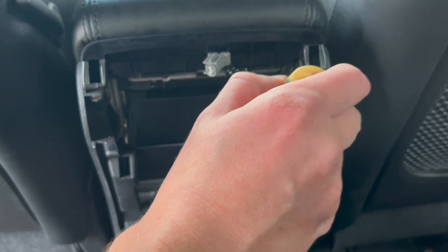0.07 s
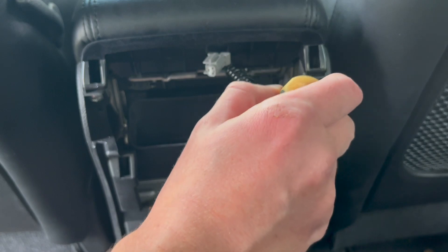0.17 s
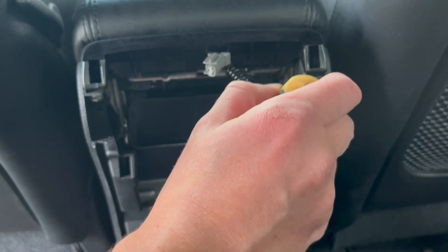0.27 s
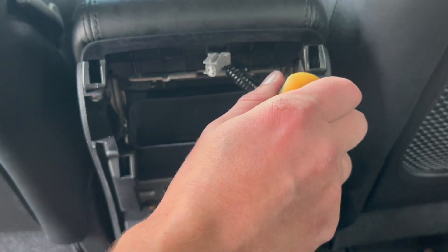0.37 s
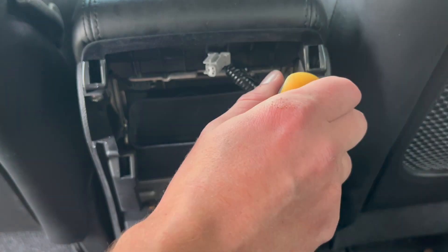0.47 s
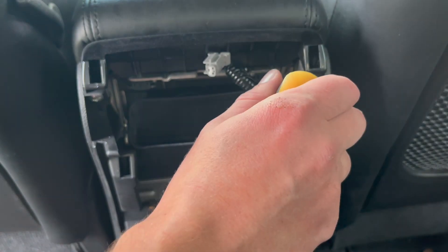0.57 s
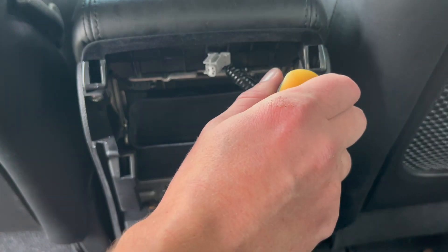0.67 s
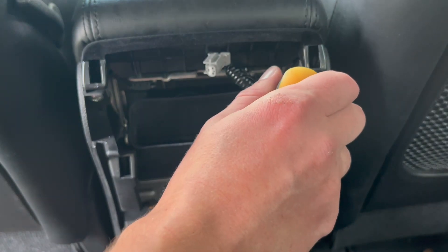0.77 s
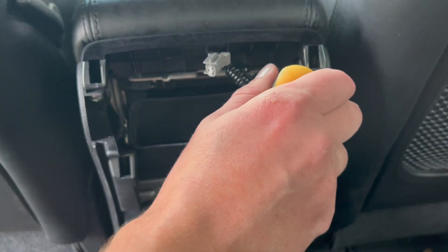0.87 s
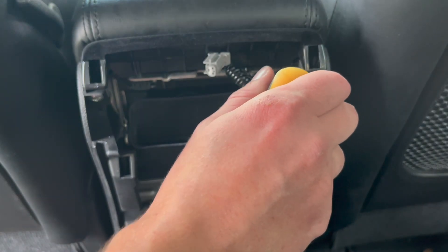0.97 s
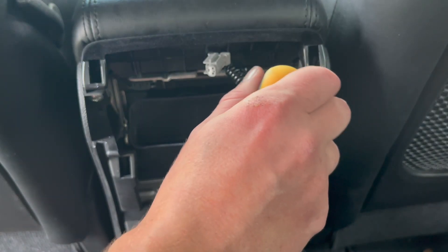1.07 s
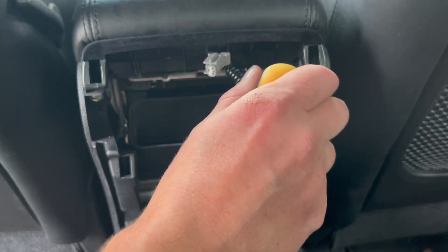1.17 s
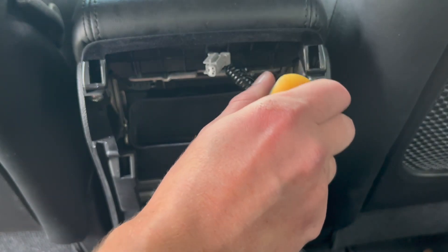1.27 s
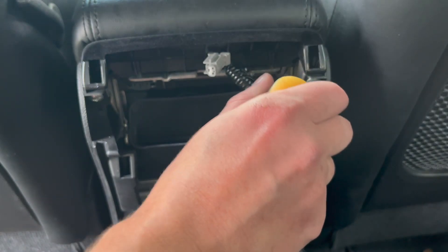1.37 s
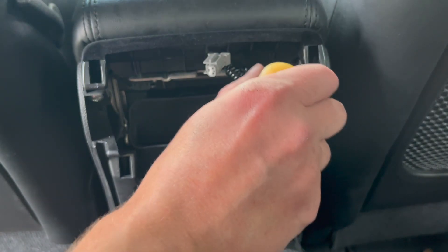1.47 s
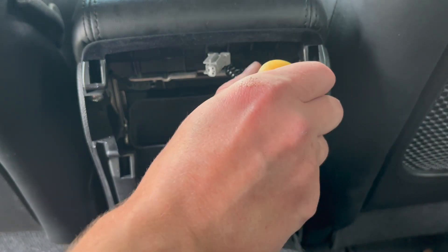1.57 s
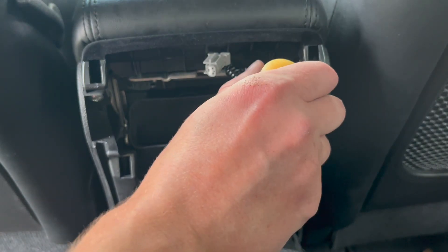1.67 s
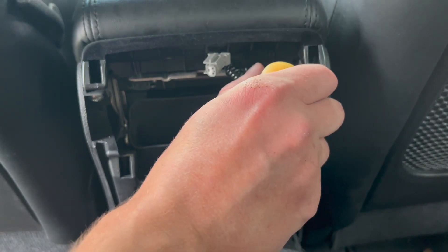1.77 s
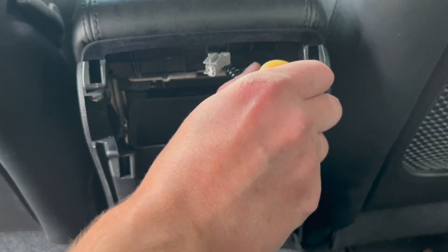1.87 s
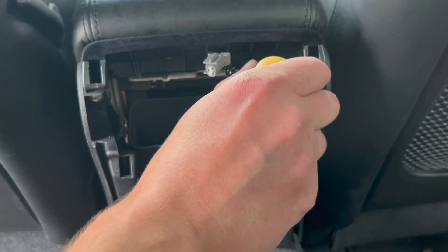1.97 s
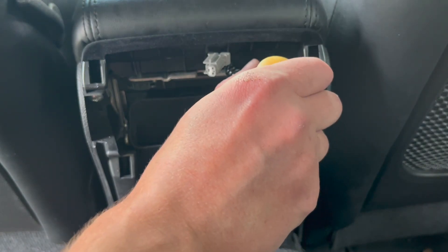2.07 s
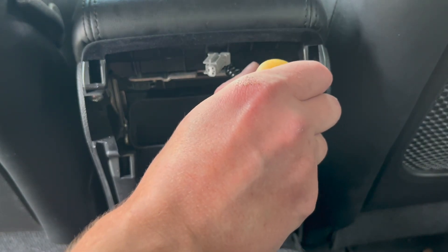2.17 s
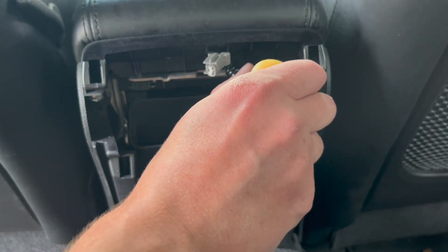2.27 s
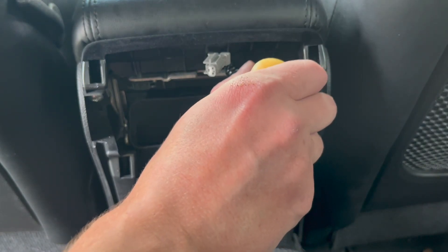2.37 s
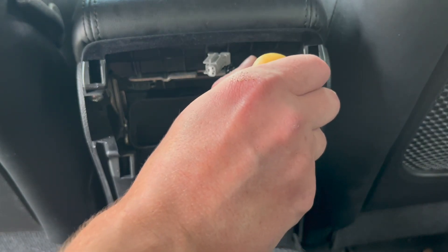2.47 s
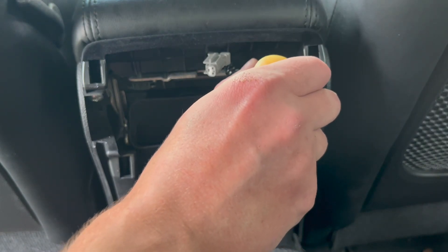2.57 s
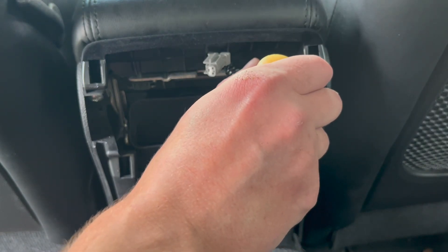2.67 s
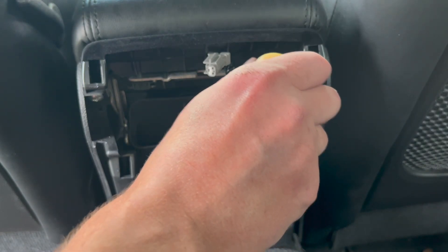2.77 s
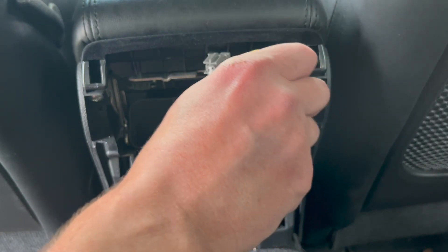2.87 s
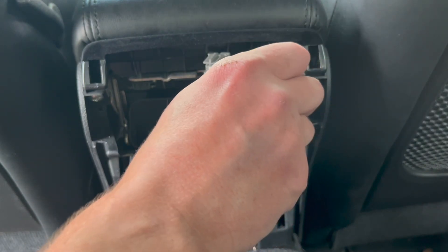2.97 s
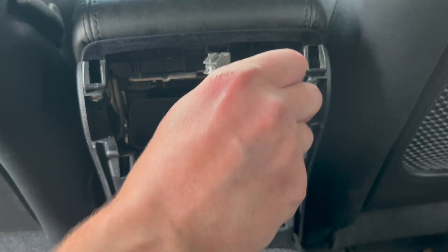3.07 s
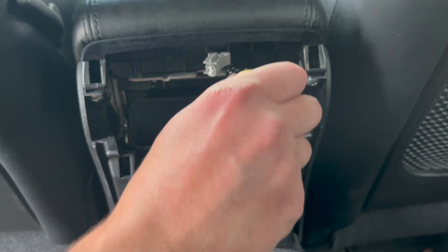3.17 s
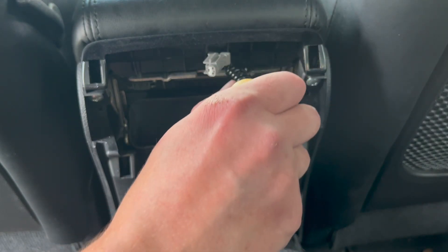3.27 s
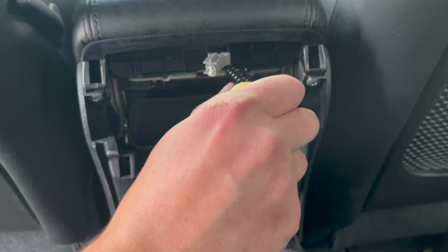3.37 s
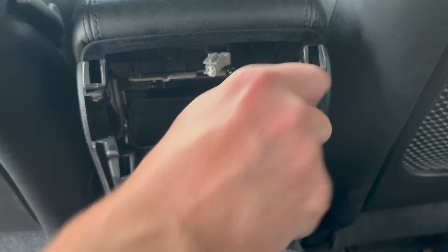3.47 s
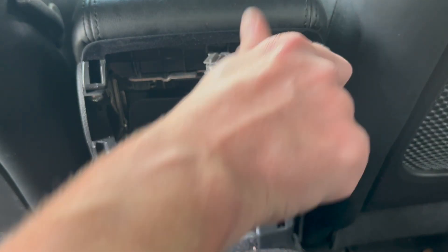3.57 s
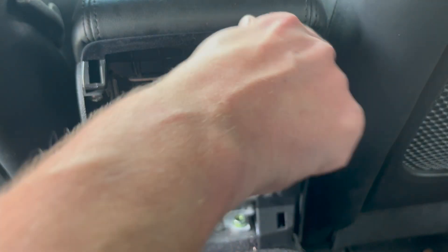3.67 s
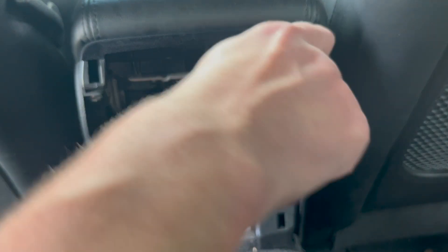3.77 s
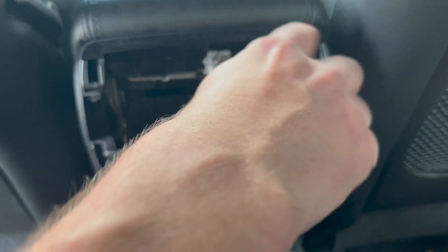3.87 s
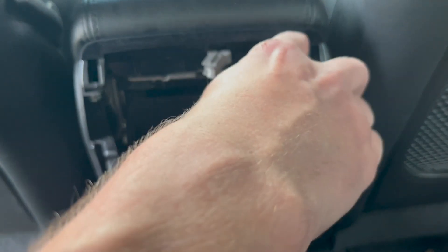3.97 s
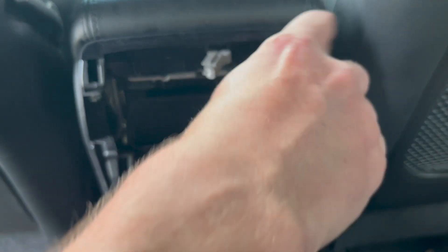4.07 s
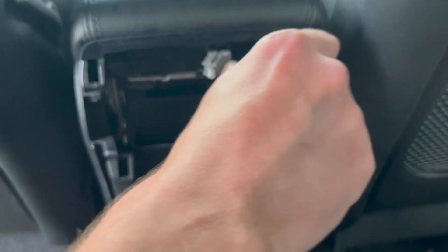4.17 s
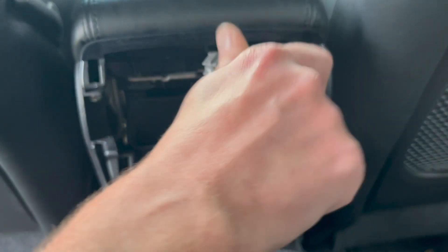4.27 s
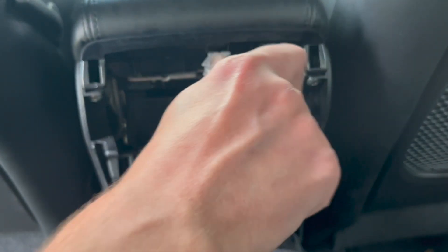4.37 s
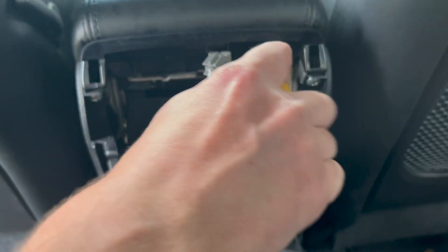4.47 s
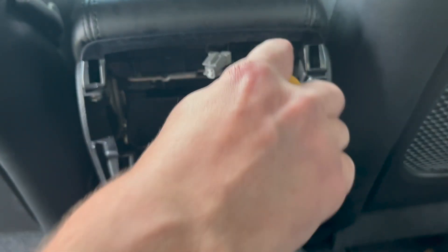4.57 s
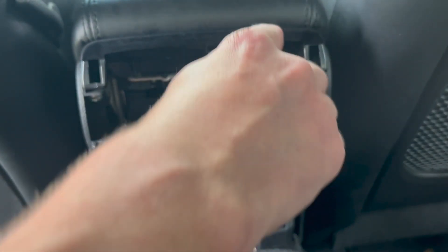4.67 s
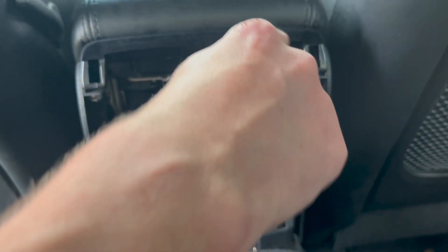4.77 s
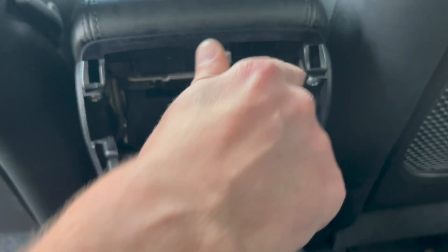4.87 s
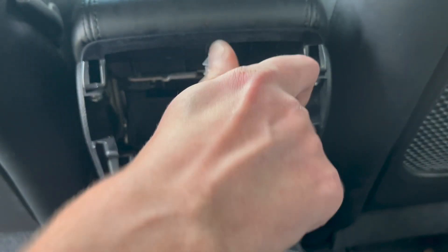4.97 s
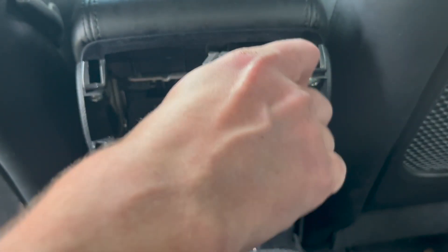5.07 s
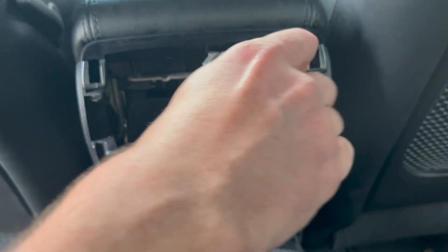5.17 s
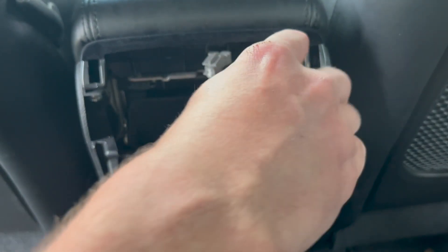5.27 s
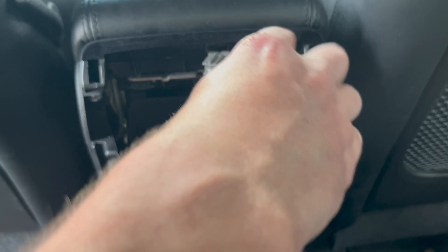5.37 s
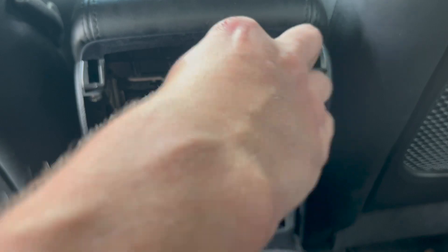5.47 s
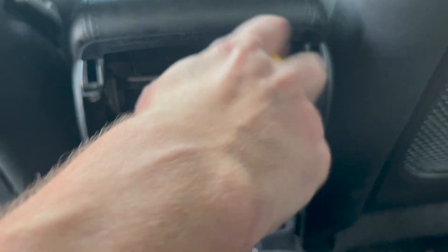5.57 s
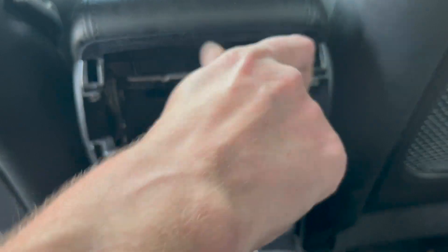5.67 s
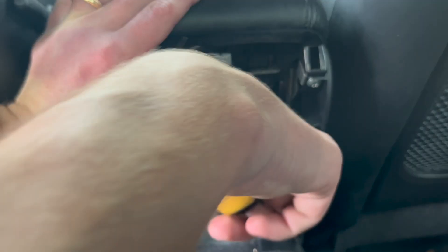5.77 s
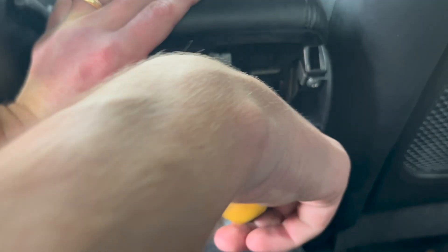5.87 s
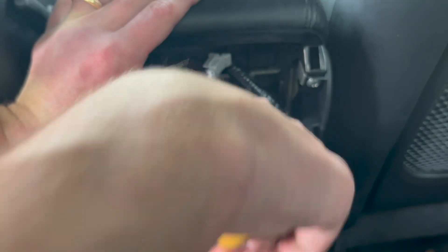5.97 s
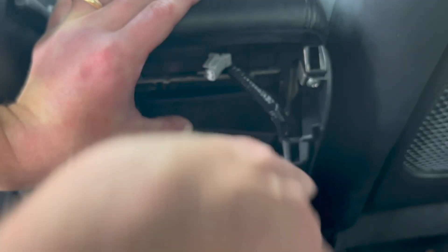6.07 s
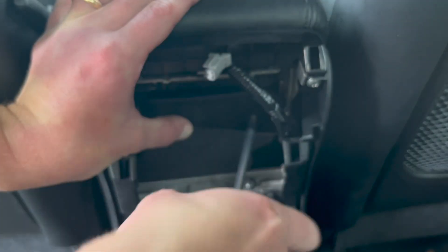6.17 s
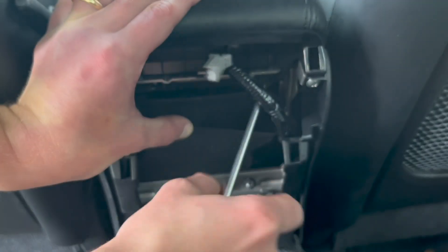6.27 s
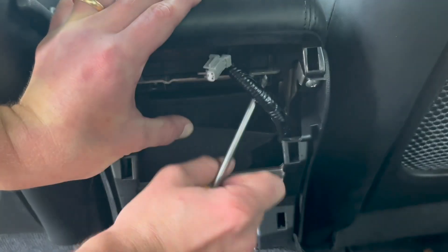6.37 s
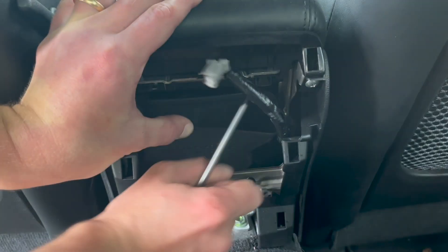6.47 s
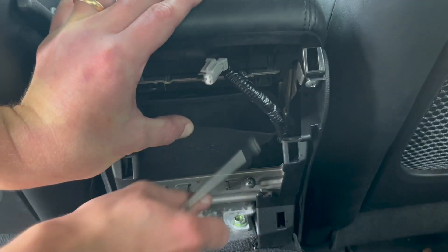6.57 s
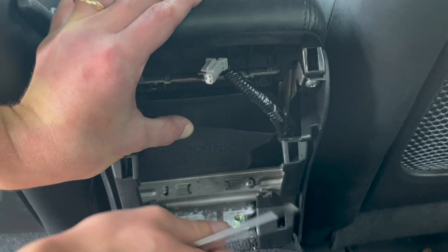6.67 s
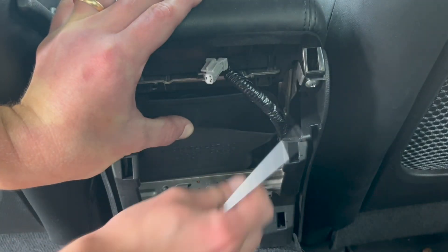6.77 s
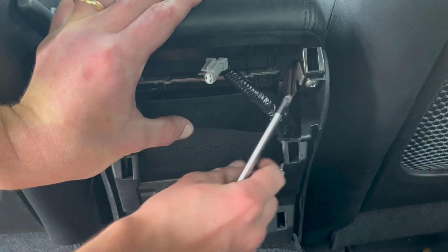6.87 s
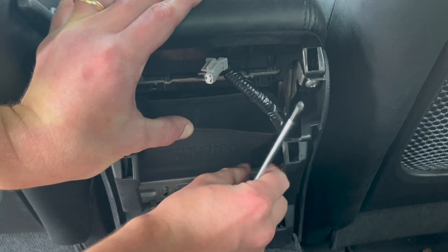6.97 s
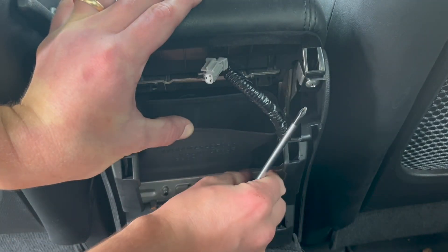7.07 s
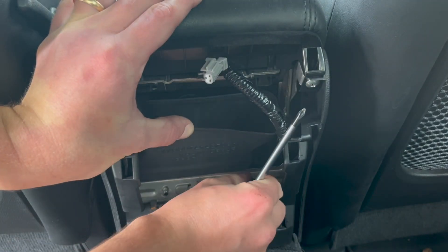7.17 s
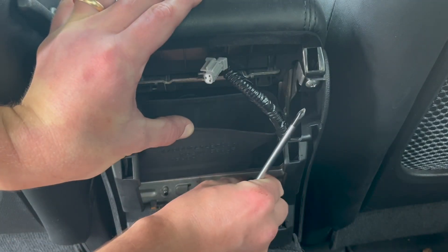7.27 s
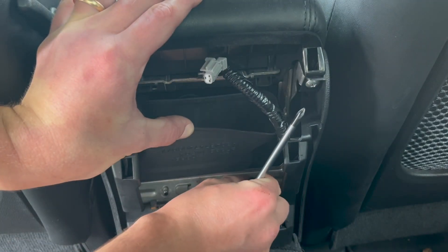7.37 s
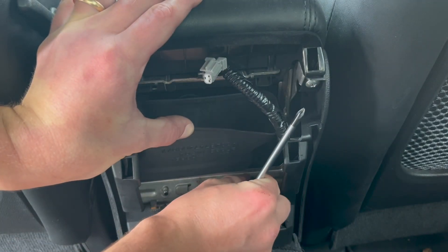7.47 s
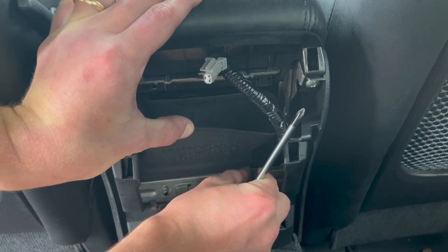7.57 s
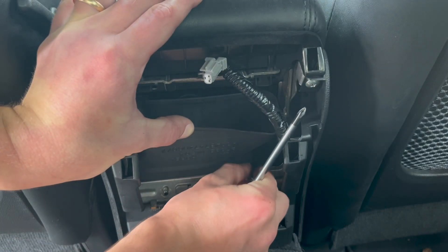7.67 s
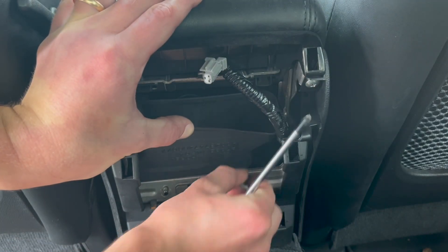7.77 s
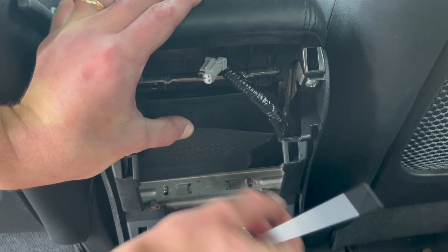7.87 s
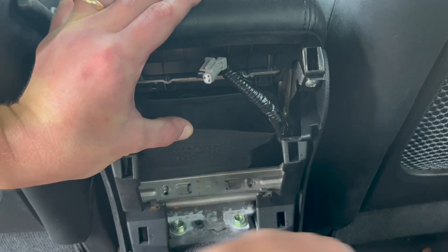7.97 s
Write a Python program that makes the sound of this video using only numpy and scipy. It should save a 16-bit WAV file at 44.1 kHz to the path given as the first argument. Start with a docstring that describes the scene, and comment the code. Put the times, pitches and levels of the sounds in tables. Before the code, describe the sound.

Inside a quiet car cabin, close and dry in mono, a ratchet screwdriver works a tight screw: a gritty steel scrape, then irregular sharp clicks with small plastic jolts, the brightest just after three seconds. Handle rattles follow, with sparse knocks, then a cluster of bumps and taps on plastic trim past six seconds and faint metallic pings. A low, wavering hum lies beneath and fades late.

```python
"""Ratchet screwdriver in a car cabin

A ratchet screwdriver backs a tight screw out of a plastic console inside a car, over a low hum, rumble and air.
Each slip is a sharp force that rings resonances of the steel shaft, the pawl and the console; steel scrapes
as random tiny slips. The hollow handle rattles in the hand, and the tool bumps and taps the trim.
Sharp blows carry a very short tail of reflections; cabin noise is coloured noise with slow level curves."""
import sys
import numpy as np
from scipy import signal
from scipy.fft import rfft, irfft, next_fast_len
from scipy.io import wavfile
from scipy.ndimage import uniform_filter1d

SR = 44100
rng = np.random.default_rng(int(sys.argv[2]) if len(sys.argv) > 2 else 0)


def master(y):
    """Save y as 16-bit WAV."""
    cut = np.clip(np.atleast_2d(y).T, -1, 1)
    pcm = np.round(cut * 32767)  # scale
    wavfile.write(sys.argv[1], SR, pcm.astype(np.int16))


N = 353064
SIZE = 8192  # samples in one contact sound
AGE = np.arange(SIZE) / SR  # seconds since the contact sound began
TIME = np.arange(N) / SR  # seconds

# Resonances of the steel shaft held in the screw. Each row: frequency in Hz, width in Hz, relative level in dB.
SHAFT_MODES = [(2340, 510, -10), (3540, 490, -6.5), (4224, 72, 0), (4760, 240, -5), (5340, 200, -13.5),
               (6760, 107, 4.5), (6540, 3800, -8.5), (7560, 690, 1), (8510, 134, 2), (9050, 400, -1),
               (10200, 960, -26), (9570, 48, 1)]
# Resonances of the ratchet's pawl. Each row: frequency in Hz, width in Hz, relative level in dB.
PAWL_MODES = [(10175, 60, 6), (11020, 90, -6), (11333, 80, 3.5), (11650, 110, 0), (12260, 130, 2.5),
              (12800, 60, -2), (13500, 250, -10), (13772, 60, -6), (14000, 130, 1), (15200, 600, -12),
              (12000, 3000, -17)]
# Resonances of the plastic console. Each row: frequency in Hz, width in Hz, relative level in dB.
CONSOLE_MODES = [(313, 100, -2.5), (566, 34, 3.5), (697, 39, -3), (846, 87, -1), (1101, 42, 1),
                 (1423, 160, -9), (1617, 28, -4.5), (1790, 84, -14), (2570, 145, -18)]
# Resonances of a hard contact's tick. Each row: frequency in Hz, width in Hz, relative level in dB.
CONTACT_MODES = [(2650, 7200, -8.5), (4180, 100, 0), (5500, 3500, -14.5), (7170, 210, 9.5),
                 (7450, 760, 1.5), (10200, 2700, 0), (12700, 17000, -16)]


def undb(db):
    """Amplitude ratio: twenty decibels are a factor of ten."""
    return 10 ** (np.asarray(db) / 20)


def curve(rows):
    """Linear interpolation in time of rows of (seconds, value)."""
    return np.interp(TIME, *np.transpose(rows))


def add(out, s, sound):
    """Superposition: mix a sound in at time s, in seconds."""
    start = int(s * SR)
    lo, hi = max(start, 0), min(start + len(sound), N)
    out[lo:hi] += sound[lo - start:hi - start]


def noise(spectrum):
    """Spectral shaping: white noise is filtered to the given colour and scaled to rms 1."""
    hz, db = np.transpose(spectrum)
    size = next_fast_len(N, True)
    f = np.maximum(np.fft.rfftfreq(size, 1 / SR), 1)
    gain = undb(np.interp(np.log(f), np.log(hz), db))
    white = rng.standard_normal(size)
    coloured = irfft(rfft(white) * gain, size)[:N]
    return coloured / coloured.std()


def wander(hz):
    """Low-pass noise: random motion of spread 1, mostly below hz."""
    return noise([(hz, 0), (2 * hz, -24), (20 * hz, -140)])


def tone(hz, db):
    """Phase is the integral of frequency: a sine of the given rms level; pitch and level may move."""
    cycles = np.cumsum(hz * np.ones(N)) / SR + rng.random()
    return np.sqrt(2) * undb(db) * np.sin(2 * np.pi * cycles)


def blow(t60, tail_db):
    """Impulse response: a sharp contact, then dense, uneven reflections decaying 60 dB in t60 seconds."""
    grit = undb(1.45 * rng.exponential(size=SIZE))
    decay = np.exp(-np.log(1000) * AGE / t60)
    tail = grit * rng.standard_normal(SIZE) * decay
    return signal.unit_impulse(SIZE) + undb(tail_db) * tail / np.linalg.norm(tail)


def ring(force, modes, db, pitch=1, tilt_db=0, damp_hz=0, soft_hz=np.inf, order=1, size=300):
    """Modal superposition: a force excites resonances; order 2 builds up slowly, as in a hollow body.

    db is the rms of the loudest stretch of size samples; tilt_db is per octave; damp_hz adds to each width.
    """
    padded = SIZE + SIZE // 8
    # scaling the frequency axis moves every resonance by the pitch ratio
    f = np.maximum(np.fft.rfftfreq(padded, 1 / SR), 1) / pitch
    response = 0
    for k, (hz, width, mode_db) in enumerate(modes):
        damped_width = width + damp_hz
        # each contact point favours other modes a little
        level_db = mode_db + tilt_db * np.log2(hz) + rng.standard_normal()
        gain = undb(level_db) * width / damped_width
        detuning = (f - hz ** 2 / f) / damped_width
        response = response + (-1) ** k * gain / (1 + 1j * detuning) ** order
    # a small part radiates little below its first mode or above its last; a soft contact dulls it further
    top = min(max(hz + 2 * width for hz, width, _ in modes), soft_hz)
    response = response / (1 + modes[0][0] / (2j * f))
    response = response / np.sqrt(1 + (f / top) ** 10)
    sound = irfft(rfft(force, padded) * response)[:SIZE]
    loudest = np.sqrt(uniform_filter1d(sound ** 2, size).max())
    return sound * undb(db) / loudest


def boom():
    """Beating: neighbouring low tones, each wavering in level and pitch, interfere."""
    # Tones of the boom. Each row: frequency in Hz, relative level in dB.
    boom_tones = [(38.2, -21.5), (51.7, -0.5), (55.3, -17.5), (58.3, -12.5), (84, -24), (87.3, -17.5),
                  (97, -22), (110, -24)]
    # Level of the boom. Each row: time in seconds, level in dB.
    boom_level = [(0.0, -43), (0.44, -43), (0.51, -49), (0.58, -44), (1.33, -44), (1.43, -53.5),
                  (1.5, -45.5), (1.73, -45), (1.94, -52.5), (2.04, -46.5), (2.24, -52), (2.33, -47.5),
                  (2.42, -51.5), (2.94, -46.5), (3.06, -52.5), (3.27, -46), (3.36, -58.5), (3.44, -48.5),
                  (4.0, -49), (4.4, -45.5), (5.1, -45.5), (5.17, -49), (5.58, -47), (5.68, -55.5),
                  (6.4, -67), (7.1, -58.5), (8.0, -67.5)]
    waver_hz, waver_db, drift_hz = 4.6, 0.7, 0.15  # rate limit, spread of level, spread of pitch
    total = np.zeros(N)
    for hz, db in boom_tones:
        total += tone(hz + drift_hz * wander(waver_hz), db + waver_db * wander(waver_hz))
    return total * undb(curve(boom_level))


def hum():
    """Line spectrum: steady sines at fixed level."""
    # Lines of the hum. Each row: frequency in Hz, level in dB.
    hum_lines = [(75.5, -63.5), (151, -79)]
    return sum(tone(hz, db) for hz, db in hum_lines)


def rumble():
    """Broadband low-frequency noise: energy gathers around 50 Hz and follows a slow level curve."""
    # Colour of the rumble. Each row: frequency in Hz, relative level in dB per Hz.
    rumble_colour = [(12, -22.5), (28, -8), (40, 1.5), (52, 5), (66, -4.5), (88, -7), (110, -9),
                     (130, -13.5), (200, -15.5), (300, -28), (600, -41)]
    # Level of the rumble. Each row: time in seconds, level in dB.
    rumble_level = [(0, -57), (.4, -64.5), (1.2, -58), (3, -59), (5.6, -61), (5.8, -62), (8, -62)]
    return noise(rumble_colour + [(3000, -100)]) * undb(curve(rumble_level))


def air():
    """Broadband flow noise: the rush of air in the cabin is strongest in the low mids."""
    # Colour of the air. Each row: frequency in Hz, relative level in dB per Hz.
    air_colour = [(100, -2), (250, 8), (450, 5), (900, -2.5), (1500, -10), (2000, -12.5), (3000, -22.5),
                  (6500, -33.5), (12000, -61)]
    # Level of the air. Each row: time in seconds, level in dB.
    air_level = [(0, -71.5), (2.3, -72.5), (3, -75), (5.5, -73.5), (6.5, -78), (8, -78)]
    return noise(air_colour) * undb(curve(air_level))


def hiss():
    """High-frequency noise: a soft hiss swells as the arm moves away."""
    # Colour of the hiss. Each row: frequency in Hz, relative level in dB per Hz.
    hiss_colour = [(1000, -8), (2500, -2.5), (4500, -3), (7000, 1), (9000, 2), (12000, 0.5), (14000, -1),
                   (16000, -20)]
    # Level of the hiss. Each row: time in seconds, level in dB.
    hiss_level = [(0, -88.5), (.5, -88.5), (6.1, -87.5), (6.3, -82), (6.7, -87), (7.6, -88), (7.9, -82.5),
                  (8, -83.5)]
    return noise(hiss_colour) * undb(curve(hiss_level))


def cabin():
    """Superposition of independent sources: boom, hum lines, rumble, moving air and hiss."""
    return boom() + hum() + rumble() + air() + hiss()


def rub():
    """Sliding friction: skin moves unevenly on the plastic grip, as noise of fluctuating level."""
    # Colour of the rub. Each row: frequency in Hz, relative level in dB per Hz.
    rub_colour = [(250, -20), (480, -7), (620, 8.5), (900, 2), (1150, -3), (1800, -6), (2300, -19.5),
                  (3000, -22), (5000, -31), (6400, -20.5), (7500, -34), (12000, -56)]
    # Level of the rub. Each row: time in seconds, level in dB before the uneven drag.
    rub_level = [(0, -68), (.2, -64.5), (.37, -69), (.41, -105.5), (8, -120)]
    drag_db = 1.4 * wander(30)
    return noise(rub_colour) * undb(curve(rub_level) + drag_db)


def pings():
    """Light damping: out of the screw the tapped shaft rings longer, with few clear tones."""
    # Taps on the free shaft. Each row: start in seconds, level in dB.
    ping_events = [(7.498, -75.5), (7.558, -65.5)]
    # Resonances of the free shaft. Each row: frequency in Hz, width in Hz, relative level in dB.
    free_modes = [(3219, 17, 0), (6002, 25, -15), (6756, 22, -9), (8506, 22, -5), (10050, 18, 1),
                  (13000, 60, -14)]
    out = np.zeros(N)
    for s, db in ping_events:
        add(out, s, ring(signal.unit_impulse(SIZE), free_modes, db))
        add(out, s, ring(blow(t60=0.09, tail_db=16), CONTACT_MODES, db - 7))
    return out


def taps():
    """Impact on a hard surface: the steel tip's broad, heavily damped modes give a thin, short ring."""
    # Light taps of the tip. Each row: start in seconds, level in dB, tilt in dB per octave.
    tap_events = [(6.3798, -55.5, -2.5), (6.5358, -58, -13), (6.8181, -60, -2), (6.864, -67, 0.5),
                  (6.881, -77, 0), (6.92, -65, 34), (7.7593, -67, 6.5)]
    # Resonances of the tip. Each row: frequency in Hz, width in Hz, relative level in dB.
    tip_modes = [(1410, 1100, -17.5), (2280, 130, 3), (3500, 640, -9.5), (5450, 510, 0.5), (6600, 1000, -8),
                 (8170, 850, -2.5), (9800, 720, -5.5), (11260, 1300, -15)]
    out = np.zeros(N)
    for s, db, tilt_db in tap_events:
        add(out, s, ring(blow(t60=0.049, tail_db=-2.5), tip_modes, db, tilt_db=tilt_db))
    return out


def bumps():
    """Contact stiffness: a hard tick, then the plastic trim's short ring, deadened to a thud if soft."""
    # Bumps on the trim. Each row: start in seconds, trim level in dB, contact tick level in dB, pitch ratio,
    # tilt in dB per octave, frequency in Hz (before the pitch ratio) above which a soft contact gives little.
    bump_events = [(4.077, -56, -79.5, 0.78, 0.5, 605), (6.381, -47.5, -47.5, 0.95, 2, 9000),
                   (6.478, -66, -68, 0.94, 6, 9000), (6.483, -57.5, -63, 1.02, 0, 5000),
                   (6.536, -47.5, -64, 0.99, 1.5, 9000), (6.548, -53.5, -71, 0.87, -4, 3000),
                   (6.822, -64.5, -72, 1.1, -4, 1510), (6.999, -51, -69, 0.85, 4.5, 900),
                   (7.758, -53, -69, 0.86, 5, 900)]
    # Resonances of the trim. Each row: frequency in Hz, width in Hz, relative level in dB.
    trim_modes = [(354, 300, -4.5), (524, 50, 10.5), (696, 260, -28), (855, 31, -3.5), (1230, 53, -4.5),
                  (1610, 170, -10), (2480, 290, -16.5), (2770, 340, -13), (4120, 12000, -36)]
    trim_delay_s = 0.001027
    out = np.zeros(N)
    for s, trim_db, tick_db, pitch, tilt_db, soft_hz in bump_events:
        damp_hz = 110 * min(1000 / soft_hz, 1) ** 2
        add(out, s, ring(blow(t60=0.059, tail_db=-1.0), CONTACT_MODES, tick_db))
        thud = blow(t60=0.073, tail_db=0.0)
        body = ring(thud, trim_modes, trim_db, pitch, tilt_db, damp_hz, soft_hz)
        add(out, s + trim_delay_s, body)
    return out


def rattles():
    """Damping by the hand: each contact ticks and rings the hollow handle, shorter in a tight grip."""
    # Grazes, knocks and bounces of the handle. Each row: start in seconds, body level in dB,
    # contact tick level in dB, tilt in dB per octave, damping by the grip as added width in Hz.
    rattle_events = [(1.264, -52, -82, -2.5, 90), (1.786, -53, -80, 0.5, 70), (3.547, -66, -86, 4.5, 3),
                     (3.709, -58, -74, -9, 31), (3.718, -58, -65, -13, 48), (3.8768, -55, -54, -3, 120),
                     (3.886, -45.5, -54.5, 1.5, 55), (3.891, -47, -64, 4, 80), (4.367, -64.5, -68.5, 4, 50),
                     (4.371, -52, -80, -3.5, 78), (4.378, -58, -71, 7, 72), (4.395, -55.5, -81, -3, 63),
                     (5.525, -63.5, -77, 4, 25), (5.5373, -48, -58.5, -2, 30), (5.554, -57, -66, 5, 82),
                     (5.575, -56.5, -74, 2, 45), (5.697, -68, -79, -1, 3), (6.242, -60, -63, 1, 118),
                     (6.249, -51.5, -67, -6, 80), (6.258, -62, -73, -1, 142), (6.2767, -56, -63, -1, 85),
                     (6.285, -72, -76, 0, 140), (6.295, -62, -74, -4, 100), (6.308, -70, -76, 8, 50),
                     (6.328, -63, -72, -4, 90), (6.343, -68, -80, -4, 120)]
    # Resonances of the handle. Each row: frequency in Hz, width in Hz, relative level in dB.
    handle_modes = [(383, 480, -14), (551, 83, 10), (827, 70, -19), (1180, 150, -16), (1524, 51, 0),
                    (2100, 430, -30.5), (2654, 110, -15), (3030, 730, -32), (3890, 150, -29.5),
                    (4180, 270, -28.5), (5580, 450, -42)]
    pitch_spread = .015  # octaves, from contact to contact
    out = np.zeros(N)
    for s, body_db, tick_db, tilt_db, grip_hz in rattle_events:
        pitch = 2 ** (pitch_spread * rng.standard_normal())
        add(out, s, ring(blow(t60=0.051, tail_db=4.5), CONTACT_MODES, tick_db))
        chatter = blow(t60=0.042, tail_db=4)
        add(out, s, ring(chatter, handle_modes, body_db, pitch, tilt_db, grip_hz, order=2))
    return out


def scrapes():
    """Stick-slip friction: tiny slips and sharper catches ring shaft, pawl and console; one mode sings."""
    # Steel rubbing on steel as the tool turns. Each row: time of the strongest moment in seconds, length in
    # seconds, # shaft level in dB, console level in dB, singing resonance in Hz, its level in dB.
    scrape_events = [(0.006, 0.043, -50, -60, 7400, -55), (0.018, 0.08, -57.5, -58.5, 1730, -55.5),
                     (0.817, 0.068, -68, -64, 8150, -96), (1.195, 0.034, -81, -64, 8600, -83),
                     (1.219, 0.077, -70, -67.5, 8460, -71), (1.245, 0.048, -62.5, -73, 8350, -74),
                     (1.416, 0.034, -64, -70, 4200, -75), (1.436, 0.045, -60, -69.5, 4260, -72),
                     (1.762, 0.13, -78.5, -71, 8400, -82), (1.98, 0.16, -80.5, -98, 8200, -89),
                     (2.185, 0.069, -82, -89, 8440, -74), (2.369, 0.059, -67.5, -76, 8060, -70.5),
                     (3.729, 0.06, -62, -73, 7450, -72), (3.744, 0.038, -60.5, -82, 9120, -60.5),
                     (3.878, 0.06, -64, -76, 7360, -65), (4.829, 0.035, -86, -74.5, 1120, -76),
                     (5.38, 0.046, -81, -92, 7000, -92), (5.855, 0.038, -73, -71, 5700, -82),
                     (6.293, 0.18, -77, -73.5, 2670, -75), (6.912, 0.068, -89, -90, 9400, -75),
                     (6.986, 0.033, -75, -94, 9900, -79)]
    rise_share = 0.43  # of the length, spent swelling
    pawl_db = -21  # relative to the shaft
    press_hz = 93  # pressing on the screw damps the shaft: added width
    catches_per_s, catch_db = 260, 15  # mean rate, size relative to noise of rms 1
    out = np.zeros(N)
    for s, length, db, buzz_db, sing_hz, sing_db in scrape_events:
        rise, fall = rise_share * length, (1 - rise_share) * length
        peak = 2 * rise  # seconds after the sound begins
        swell = np.exp(-3 * np.maximum(2 - AGE / rise, (AGE - peak) / fall))
        catches = undb(catch_db) * (rng.random(SIZE) < catches_per_s / SR)
        fine = rng.standard_normal(SIZE) * undb(1.06 * rng.exponential(size=SIZE))
        slips = swell * (fine + catches)
        shaft = ring(slips, SHAFT_MODES, db, damp_hz=press_hz)
        pawl = ring(slips, PAWL_MODES, db + pawl_db)
        sing = ring(slips, [(sing_hz, 330, 0)], sing_db, order=2)
        buzz = ring(slips, CONSOLE_MODES, buzz_db)
        add(out, s - peak, shaft + pawl + sing + buzz)
    return out


def ratchet():
    """Impulsive excitation: the pawl snaps over a tooth; the shaft rings and jolts the console."""
    # Ratchet clicks. Each row: start in seconds, shaft level in dB, pawl level in dB,
    # console level in dB, tilt of the pawl's ring in dB per octave.
    click_events = [(0.18, -47.5, -90, -50, -3), (0.963, -77.5, -73.5, -58, -18), (1.26, -71, -84, -54, 0),
                    (1.6874, -50, -52, -54.5, -26), (1.7805, -68, -77, -54, -8),
                    (1.7863, -70, -79, -56.5, -8), (2.087, -68.5, -92, -63.5, 0),
                    (2.095, -69.5, -91, -62, 0), (2.2079, -50, -51.5, -48, 10), (2.531, -67, -76, -52, -8),
                    (2.609, -78.5, -92, -66, 0), (3.242, -46, -37.5, -51.5, -6),
                    (3.354, -62, -68, -51.5, -5), (3.46, -88, -84, -63, -2), (3.526, -71.5, -75, -89, -4)]
    out = np.zeros(N)
    for s, shaft_db, pawl_db, console_db, pawl_tilt_db in click_events:
        # the stronger the shaft over the console, the sharper the snap and the brighter the console
        console_tilt_db = 2 + 0.2 * (shaft_db - console_db)
        add(out, s, ring(blow(t60=0.057, tail_db=31.0), SHAFT_MODES, shaft_db))
        add(out, s, ring(blow(t60=0.049, tail_db=1.5), PAWL_MODES, pawl_db, tilt_db=pawl_tilt_db))
        jolt = blow(t60=0.056, tail_db=5)
        add(out, s, ring(jolt, CONSOLE_MODES, console_db, tilt_db=console_tilt_db))
    return out


def scene():
    """Superposition: the tool at arm's length in the humming cabin, as one channel."""
    background = cabin() + rub()
    handling = pings() + taps() + bumps() + rattles()
    screw = scrapes() + ratchet()
    return (background + handling + screw)[None]


def record(dry):
    """Gating and band-limiting: the sound cuts out twice briefly, with a click; the top is cut off."""
    # Dropouts. Each row: start in seconds, end in seconds, click level in dB.
    dropouts = [(.3735, .403, -38.5), (5.711, 5.739, -56)]
    top_hz = 15800
    live, clicks = np.ones(N), np.zeros(N)
    for start, end, db in dropouts:
        live[(TIME > start) & (TIME < end)] = 0
        # a pulse grows within milliseconds and stops dead as the dropout starts
        clicks += undb(db) * np.exp(-abs(TIME - start) / .003) * (TIME < start)
    live = uniform_filter1d(live, size=130)  # fades of about 3 ms
    low_pass = signal.ellip(8, .2, 70, top_hz, fs=SR, output="sos")
    return signal.sosfilt(low_pass, dry * live + clicks)


dry = scene()
out = record(dry)
master(out)
```